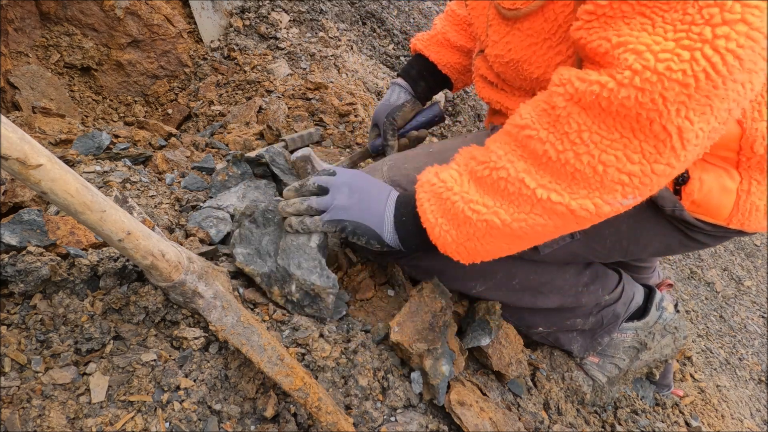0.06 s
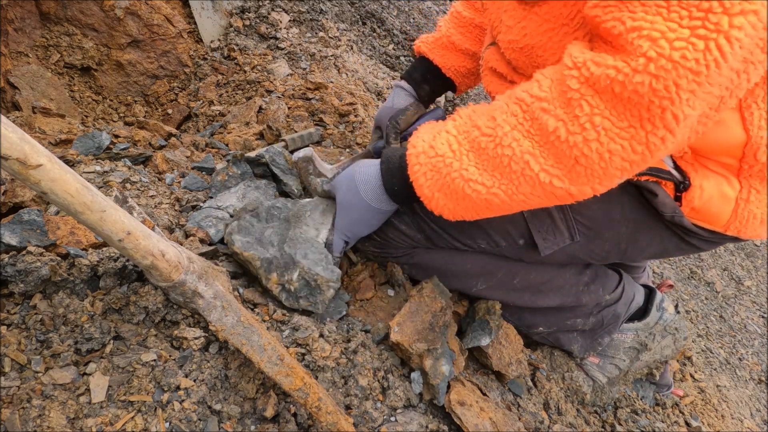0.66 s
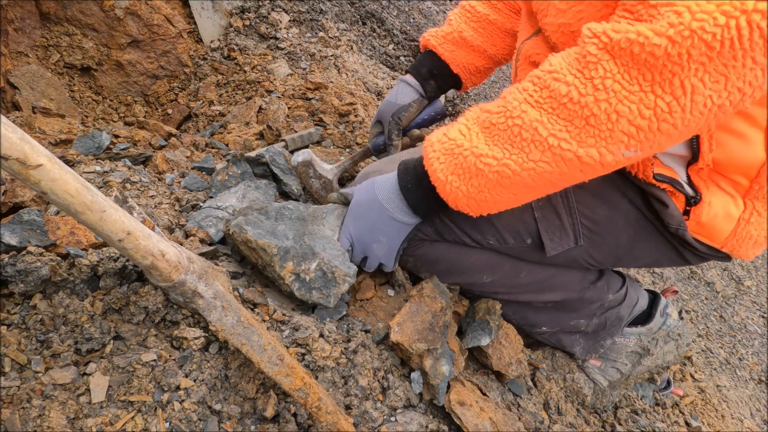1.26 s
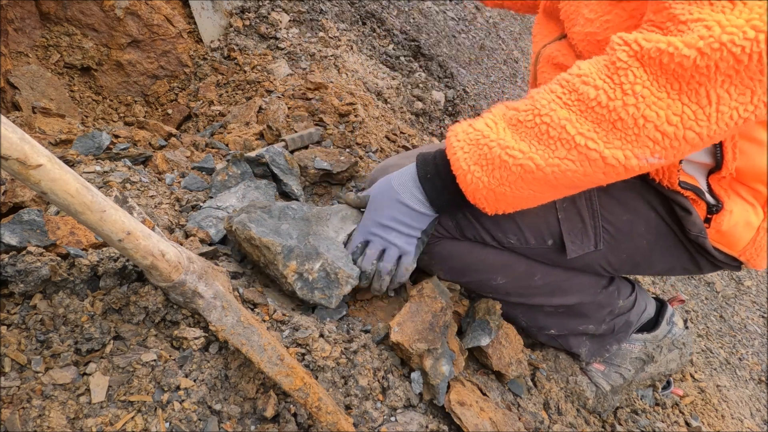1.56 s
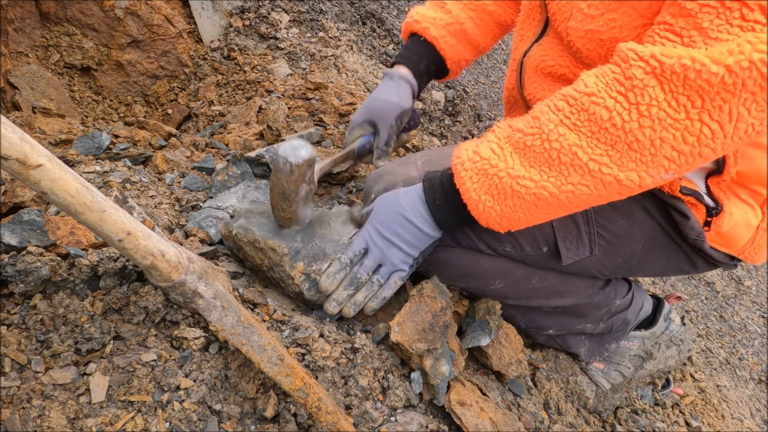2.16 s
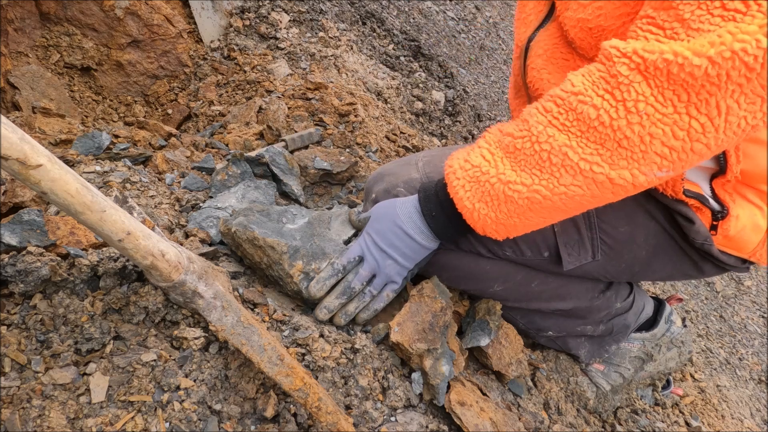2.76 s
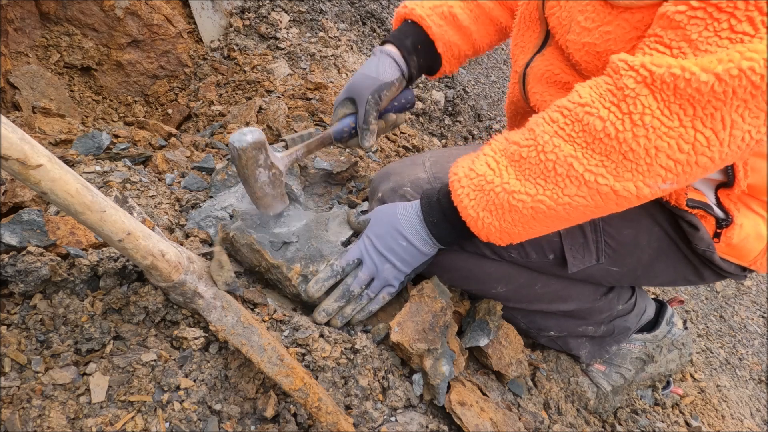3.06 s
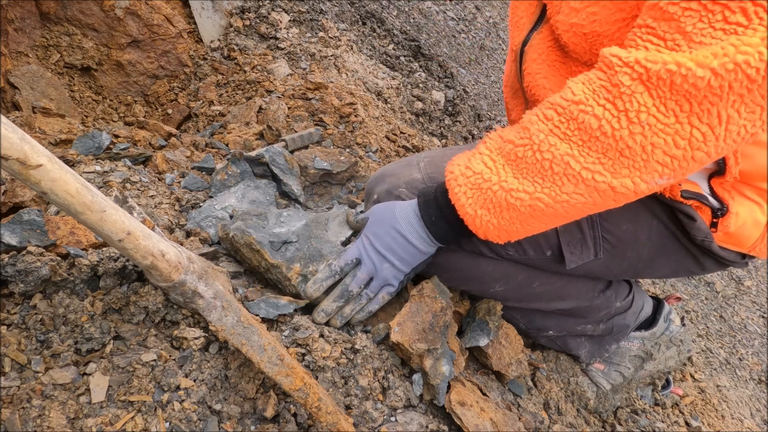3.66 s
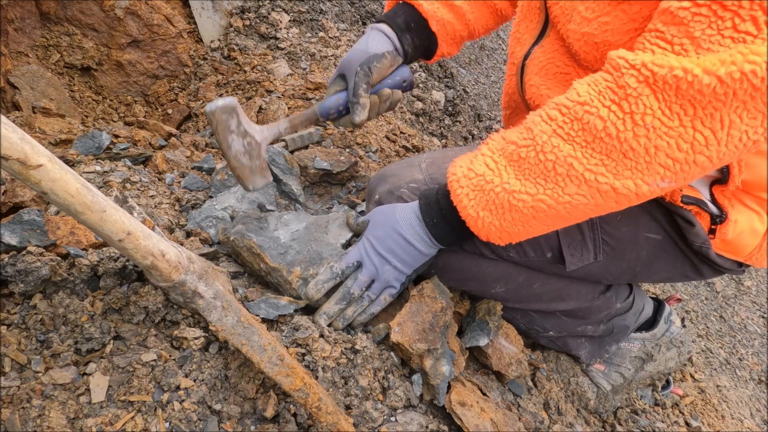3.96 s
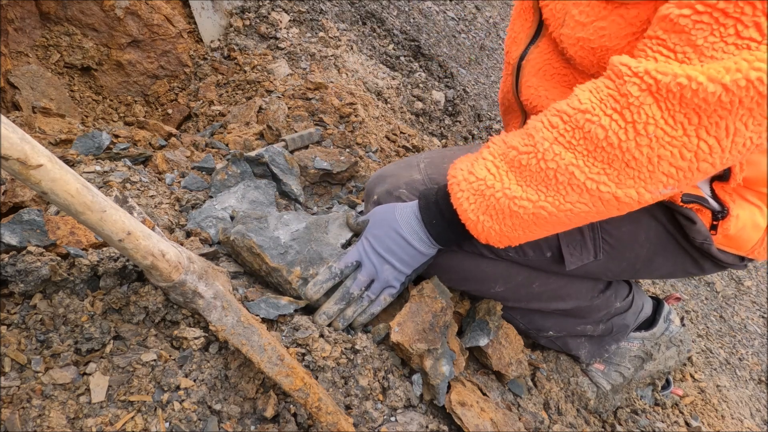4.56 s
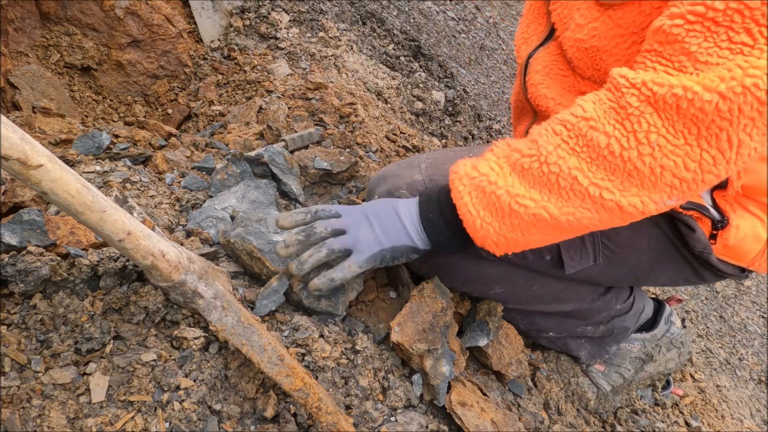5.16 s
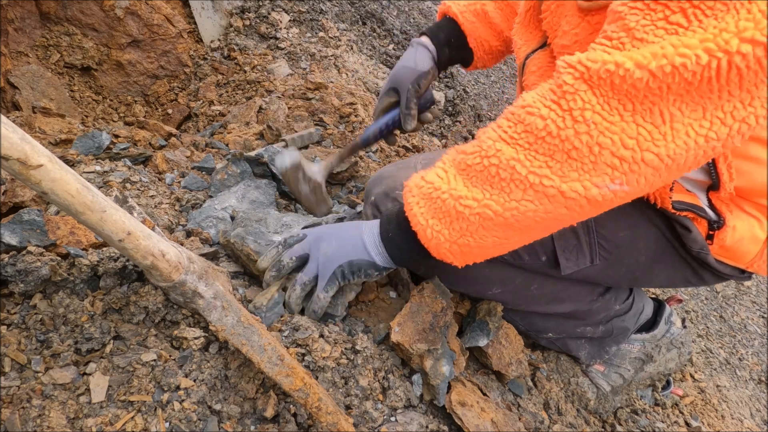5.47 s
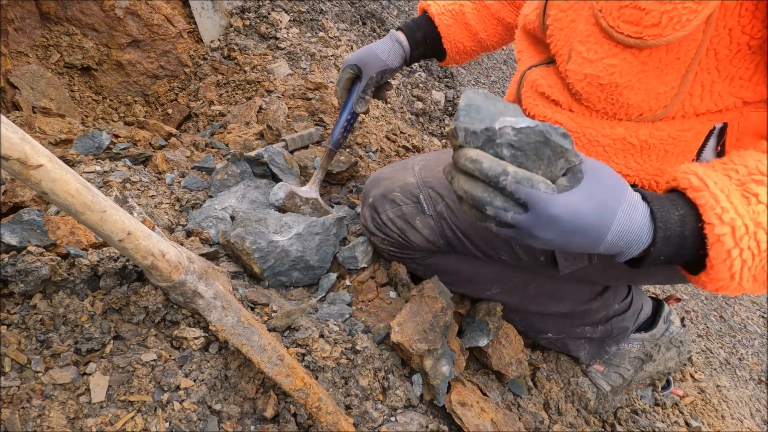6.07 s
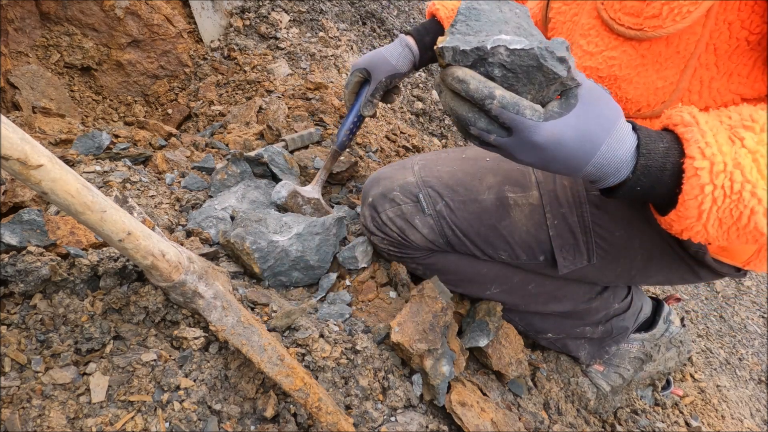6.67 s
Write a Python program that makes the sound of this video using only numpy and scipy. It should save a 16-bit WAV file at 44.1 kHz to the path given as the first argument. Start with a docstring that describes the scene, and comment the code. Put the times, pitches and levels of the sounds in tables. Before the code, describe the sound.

A rock is handled close by in the open air, over a low rumble and faint hiss of distant traffic. At about 0.1 seconds it tips over with a hollow knock and a thud. Until 2 seconds, gloves and sleeves brush it softly, it scrapes over grit in short strokes, and small stones tick. A hand hammer then strikes the rock five times, at about 2.3, 3.1, 4.0, 4.8 and 5.6 seconds. Each blow is a dry crack with a very brief ring and a thud from the clay beneath; the last is duller. Fine crumbs and chips patter down after the blows, and a thin flake clinks at 3.2 seconds. Stones knock, scrape lightly and click amid glove rustle from about 5.3 to 6 seconds. The traffic dips at every blow and creeps back, remaining nearly alone until the end at about 7 seconds.

```python
"""A hand hammer splits a grey rock, swung by a collector kneeling in an open clay pit.
Each blow is a dry crack, as steel makes the stone ring briefly, and a thud of the ground beneath.
Chips and crumbs fall, gloves and sleeves brush the rock, and the rock scrapes over grit.
Far traffic rumbles and hisses behind; it sinks at every blow and creeps back."""
import sys
import numpy as np
from scipy import signal
from scipy.fft import rfft, irfft
from scipy.io import wavfile

SR = 44100
rng = np.random.default_rng(int(sys.argv[2]) if len(sys.argv) > 2 else 0)


def log_audio(samples):
    """Write samples as a 16-bit WAV file to the path given in sys.argv[1]."""
    # one column per channel
    frames = np.atleast_2d(samples).T
    # limit to full scale, then quantise
    limited = np.clip(frames, -1, 1)
    pcm = np.round(limited * 32767).astype(np.int16)
    wavfile.write(sys.argv[1], SR, pcm)


N = 300762
TIME = np.arange(N) / SR

# Hammer blows: start_s, thud_db, traffic_sink_db, hiss_drop_db, lead_in_db,
# seven ring_db values (one for each pitch of colour_hz in cracks), grit_db
BLOWS = [(2.2990, -16.5, 10.2, 12, 1, -19, -6, -7.5, -16.5, -38.5, -19.5, -21.5, -39),
         (3.1315, -14.5, 10.45, 4.5, 0, -19, -8.5, -13, -6.5, -29, -14, -28.5, -39.5),
         (3.9593, -17, 11.4, 3.5, -0.5, -19, -6.5, -8, -17, -9, -17, -17.5, -38),
         (4.7959, -15.5, 10.56, -3.5, -7, -9.5, -14, -2, -16.5, -20.5, -15.5, -27, -41),
         (5.6066, -16, 7.1, -2, -24.5, -16, -26, -18.5, -10, -8.5, -42, -55, -35)]


def from_db(db):
    """Turn decibels into a gain to multiply by."""
    return 10 ** (np.asarray(db) / 20)


def rms_one(x):
    """Scale a sound so that its average power is 1."""
    return x / np.sqrt(np.mean(x ** 2) + 1e-20)


def at_hz(points, hz):
    """Read between rows of (pitch_hz, value), with octaves evenly spaced."""
    pitch, value = np.transpose(points)
    return np.interp(np.log(hz), np.log(pitch), value)


def add(track, start_s, sound):
    """Mix a short sound into a track."""
    start = max(round(start_s * SR), 0)
    track[..., start:start + sound.shape[-1]] += sound[..., :N - start]


def lean(hz):
    """Left and right gains of a near sound at this pitch."""
    # How much louder the left side is: pitch_hz, left_minus_right_db
    balance = [(200, 0), (750, -2.3), (1500, 0), (3000, .6), (6000, 2), (12000, 4.8)]
    return from_db(np.array([[.5], [-.5]]) * at_hz(balance, hz))


def noise(spectrum, grain_db=0, near=False):
    """Noise shaped by rows of (pitch_hz, level_db); grains of uneven size make it crackle."""
    hz = np.maximum(np.fft.rfftfreq(N, 1 / SR), 1)
    grains = rng.standard_normal(N) * from_db(grain_db * np.clip(rng.standard_normal(N), -3, 3))
    fade_ends = 1 / (1 + (spectrum[0][0] / hz) ** 4) / (1 + (hz / spectrum[-1][0]) ** 12)
    colour = from_db(at_hz(spectrum, hz)) * fade_ends * (lean(hz) if near else 1)
    return rms_one(irfft(rfft(grains) * colour, N))


def ring(t, hz, ring_s):
    """One tone of a struck object: it starts within a cycle and fades by 60 dB in ring_s."""
    onset = 1 - np.exp(-2 * np.pi * hz * t)
    return onset * np.sin(2 * np.pi * hz * t) * np.exp(-np.log(1000) * t / ring_s)


def swell(middle_s, half_s):
    """A smooth rise and fall of height 1."""
    return np.exp(-.5 * ((TIME - middle_s) / half_s) ** 2)


def strokes(rows):
    """The pressure of a hand: every stroke swells and fades."""
    return sum(from_db(db) * swell(middle_s, half_s) for middle_s, half_s, db in rows)


def clumps(depth_db, per_s):
    """Sticking and slipping: a gain that jumps up and down many times a second."""
    steps = np.clip(rng.standard_normal(N // 16), -2, 2)
    return rms_one(from_db(depth_db * np.interp(TIME * per_s, np.arange(len(steps)), steps)))


def sinking(sink_s=.033, recover_db_per_s=4.5, drop_s=.12):
    """How far the background dips after each blow: a slowly recovering part and a brief part."""
    slow_db, brief_db = np.zeros(N), np.zeros(N)
    for start_s, _, sink_db, drop_db, *_ in BLOWS:
        age = np.maximum(TIME - start_s, 0)
        onset = np.minimum(age / sink_s, 1)
        slow_db = np.maximum(slow_db, onset * (sink_db - recover_db_per_s * age))
        brief_db += onset * drop_db * np.exp(-(age / drop_s) ** 4)
    return slow_db, brief_db


def traffic(rumble_db=-40.5, tyre_db=-56.5, rumble_side_db=-22, tyre_side_db=-10):
    """Far engines rumble; tyres hiss a little wider and swell once. Both sink after each blow."""
    # Engine rumble: pitch_hz, level_db
    rumble_colour = [(12, -33), (20, -5.5), (38, 1), (60, -2), (125, -11), (166, -19.5), (208, -21),
                     (271, -30.5), (400, -36.5), (520, -54.5), (880, -120)]
    # Tyre hiss: pitch_hz, level_db
    tyre_colour = [(250, -10), (400, -10), (600, -7), (800, -8.5), (1050, -4.5), (1300, 0), (1480, 0),
                   (1750, -10.5), (2300, -15), (3000, -27.5), (5000, -37), (12000, -42.5)]
    sides = np.array([[1], [-1]])
    rumble = noise(rumble_colour) + sides * from_db(rumble_side_db) * noise(rumble_colour)
    tyres = noise(tyre_colour) + sides * from_db(tyre_side_db) * noise(tyre_colour)
    sunk_db, drop_db = sinking()
    swell_db = 4 * swell(middle_s=.833, half_s=.15)
    rumble_gain = from_db(rumble_db - .7 * sunk_db)   # the rumble sinks less than the hiss
    tyre_gain = from_db(tyre_db + swell_db - sunk_db - drop_db)
    return rumble_gain * rumble + tyre_gain * tyres


def cloth(rest_db=-90.5):
    """Gloves and sleeves brush softly over the rock and never lie quite still."""
    # Brushing strokes: middle_s, half_length_s, level_db
    brushes = [(0.03, 0.094, -62), (0.32, 0.043, -58.5), (0.53, 0.052, -68.5), (0.82, 0.098, -61),
               (1.0, 0.051, -62.5), (1.38, .11, -66), (1.72, 0.074, -56), (1.97, 0.048, -64.5),
               (2.69, 0.011, -82), (2.84, 0.012, -81.5), (3.04, 0.087, -84), (3.85, 0.1, -80.5),
               (4.615, 0.021, -72), (5.08, 0.073, -78), (5.26, 0.048, -71.5), (5.45, 0.045, -65),
               (5.63, 0.064, -63), (5.86, 0.12, -70)]
    # Cloth rustle: pitch_hz, level_db
    colour = [(1200, -13.5), (2000, -1), (3000, -1), (4200, -4.5), (5500, -5.5), (7500, -7), (8700, -18),
              (10200, -11.5), (12400, -15), (15000, -30.5)]
    rustle = noise(colour, grain_db=7, near=True) * clumps(depth_db=2.2, per_s=110)
    return (from_db(rest_db) + strokes(brushes)) * rustle


def scrapes():
    """Stone dragged over grit rasps in short, catching strokes."""
    # Drags of the rock: middle_s, half_length_s, level_db
    drags = [(0.078, 0.0061, -46), (0.105, 0.0075, -48.5), (0.532, 0.003, -57), (0.555, 0.008, -56),
             (0.753, 0.0079, -59.5), (0.87, 0.027, -63), (0.997, 0.014, -52), (1.676, 0.036, -56.5),
             (1.732, 0.0075, -52), (1.763, 0.0078, -48), (1.813, 0.014, -49.5), (5.45, 0.015, -56.5),
             (5.565, 0.007, -56.5)]
    # Rasp of stone: pitch_hz, level_db
    colour = [(940, -7), (1600, 1), (3260, -1), (4030, -4.5), (7840, -11), (8720, -16), (10500, -12),
              (12800, -17), (16000, -38)]
    rasp = noise(colour, grain_db=9, near=True) * clumps(depth_db=2.6, per_s=400)
    return strokes(drags) * rasp


def crumbs(level_db=-78.5, flight_s=.26, spread_s=.091, low_hz=4500, high_hz=12000):
    """Fine crumbs thrown up by each blow patter down in a thin shower."""
    shower = sum(swell(start_s + flight_s, spread_s) for start_s, *_ in BLOWS)
    patter = noise([(low_hz, 0), (high_hz, -4)], grain_db=9, near=True) * clumps(depth_db=5, per_s=160)
    return from_db(level_db) * shower * patter


def flake():
    """A thin plate of stone drops on one edge, then lies flat, ringing at each touch."""
    # Touches on the ground: start_s, level_db
    touches = [(3.218, -49), (3.2318, -54)]
    # Tones of the flake: pitch_hz, level_db, ring_s
    tones = [(800, -6.5, 0.098), (1001, 3, 0.077), (1400, 4.5, 0.042), (1848, -7, 0.063)]
    out, t = np.zeros(N), np.arange(SR // 5) / SR
    clink = sum(from_db(db) * ring(t, hz, ring_s) for hz, db, ring_s in tones)
    for start_s, db in touches:
        add(out, start_s, from_db(db) * clink)
    return out


def chips(octaves=.89, cycles=12, settle_s=.00083, dull_hz=11000, count=20):
    """Every chip has brief tones of its own and touches down on several corners."""
    # Falling chips and small stones knocking: start_s, level_db, centre_hz
    landings = [(0.5996, -41.5, 3070), (0.7194, -41.5, 2660), (1.0764, -44.5, 6860), (2.5402, -56, 8650),
                (2.5702, -49.5, 9500), (3.2172, -49, 3850), (3.2295, -53, 3800), (3.2975, -52, 6000),
                (3.3599, -53, 6650), (3.6038, -49.5, 6200), (4.0876, -45, 3120), (4.0925, -41, 7300),
                (4.9898, -55.5, 6160), (5.337, -35, 1900), (5.796, -48, 7140), (5.8846, -42, 2100),
                (5.899, -46.5, 3580), (5.975, -47, 3860)]
    out, t = np.zeros((2, N)), np.arange(SR // 20) / SR
    for start_s, level_db, centre_hz in landings:
        pitches = np.clip(centre_hz * 2 ** (octaves * rng.uniform(-1.21, 1, count)), 600, 13000)
        touches = settle_s * rng.exponential(1, count)
        tick = sum(rng.normal() * ring(np.maximum(t - late_s, 0), hz, cycles / hz)
                   for hz, late_s in zip(pitches, touches))
        add(out, start_s, from_db(level_db) * lean(centre_hz) * tick / np.abs(tick).max())
    return signal.sosfilt(signal.butter(3, dull_hz, fs=SR, output="sos"), out + 1e-18)


def bounce(t, start_hz, sag_s, spread_s, peak_s=.012):
    """The rock bounces on soft clay; the pitch sags as the weight comes off the ground."""
    cycles = start_hz * sag_s * (1 - np.exp(-t / sag_s))
    return -np.sin(2 * np.pi * cycles) * np.exp(-((t - peak_s) / spread_s) ** 2)


def thuds(tip_s=.11, tip_db=-17.5):
    """The ground thuds under every blow, and once with a hollow knock as the rock is tipped over."""
    # Tones of the hollow knock: pitch_hz, level_db, ring_s
    tones = [(243, -22.5, 0.054), (322, -27.5, 0.044), (613, -36, 0.015)]
    out, t = np.zeros(N), np.arange(SR // 10) / SR
    thud = bounce(t, start_hz=91, sag_s=.055, spread_s=.0165)
    for start_s, thud_db, *_ in BLOWS:
        add(out, start_s, from_db(thud_db) * thud)
    knock = sum((-1) ** k * from_db(db) * ring(t, hz, ring_s) for k, (hz, db, ring_s) in enumerate(tones))
    add(out, tip_s, knock + from_db(tip_db) * bounce(t, start_hz=105, sag_s=.05, spread_s=.011))
    return out


def grit(hold_s=.004, crush_s=.026, crush_db=3, scatter_s=.16, scatter_db=-19):
    """Stone crushes under the hammer, then dust sprays and the clay banks scatter the sound."""
    # Crumbling stone: pitch_hz, level_db
    colour = [(300, 2.5), (700, 5), (1500, -2.5), (3000, -5), (4300, -10), (7000, -11), (9000, -21),
              (12000, -21), (15000, -25)]
    level, t = np.zeros(N), np.arange(SR // 4) / SR
    after = np.maximum(t - hold_s, 0)
    fade = from_db(crush_db - 60 * after / crush_s) + from_db(scatter_db - 60 * after / scatter_s)
    for start_s, *_, grit_db in BLOWS:
        add(level, start_s, from_db(grit_db) * fade)
    return level * noise(colour, grain_db=4, near=True)


def lead_in(crack, gap_s=.0104, late_tick_db=-17, early_tick_db=-30):
    """Two faint, duller ticks and a short hollow swell run just ahead of each crack."""
    # Narrow bands that swell: pitch_hz, width_hz, level_db
    bands = [(680, 90, -4), (895, 37, 4), (7900, 53, -0.5)]
    start_s, _, _, _, lead_in_db, *_ = np.transpose(BLOWS)
    source = crack * from_db(np.interp(TIME, start_s, lead_in_db)) + 1e-18
    tick = signal.sosfilt(signal.butter(1, [700, 5000], "band", fs=SR, output="sos"), source)
    gap = round(gap_s * SR)
    out = from_db(late_tick_db) * np.roll(tick, -gap, axis=1)
    out += from_db(early_tick_db) * np.roll(tick, -2 * gap, axis=1)
    for hz, width_hz, level_db in bands:
        band = signal.iirpeak(hz, hz / width_hz, fs=SR)
        # filtering backwards in time makes the band grow towards the crack
        out += from_db(level_db) * signal.lfilter(*band, source[:, ::-1])[:, ::-1]
    return out


def cracks(stagger_s=.0003, detune=.015):
    """Each hammer blow rings the rock briefly; where it lands sets which tones are strong."""
    # Tones of rock and hammer head, damped by clay and hand: pitch_hz, level_db, ring_s
    tones = [(203, -3, 0.051), (292, -1, 0.015), (396, -5, 0.026), (542, -0.5, .017), (658.5, 1, 0.014),
             (904.6, 0.5, 0.0097), (1420, 0.5, 0.0098), (1750, 1, 0.0078), (2010, -2, 0.0097),
             (2452, -2.5, .007), (2920, 2, 0.0047), (3440, -4.5, 0.0066), (4730, -2, 0.0031),
             (5400, -6.5, 0.0053), (6040, -8, 0.0062), (6920, -1, 0.0048), (7830, -9.5, 0.0031),
             (10340, -5, 0.0053), (11670, -7.5, 0.0072), (12300, -2.5, 0.0036)]
    # Pitches at which a blow's ring_db values apply: pitch_hz
    colour_hz = [400, 800, 1550, 2900, 4300, 7000, 12000]
    out, t = np.zeros((2, N)), np.arange(SR // 10) / SR
    for start_s, _, _, _, _, *ring_db, _ in BLOWS:
        for k, (hz, level_db, ring_s) in enumerate(tones):
            strength = from_db(level_db + np.interp(np.log(hz), np.log(colour_hz), ring_db))
            # the hammer bites in stages, so the short high tones start unevenly
            late_s = stagger_s * abs(rng.normal()) * (hz > 2000)
            pitch_hz = hz * (1 + detune * rng.normal())
            add(out, start_s + late_s, (-1) ** k * strength * lean(hz) * ring(t, pitch_hz, ring_s))
    return out


def scene():
    """Blows and handling close by, traffic far off, no walls."""
    # The near sounds reach left and right a little out of step: pitch_hz, left_ahead_radians
    side_lead = [(150, 0), (750, -0.22), (1500, .3), (4000, -0.69), (12000, -0.91)]
    crack = cracks()
    near = crack + lead_in(crack) + grit() + thuds() + chips() + flake() + crumbs() + cloth() + scrapes()
    hz = np.maximum(np.fft.rfftfreq(N, 1 / SR), 1)
    side_shift = np.exp(np.array([[.5j], [-.5j]]) * at_hz(side_lead, hz))
    return irfft(rfft(near) * side_shift, N) + traffic()


def record(dry):
    """The tallest peaks are flattened, the highest treble droops and the very top is cut."""
    ceiling, droop_hz, cutoff_hz = .53, 14000, 17400
    limited = dry / (1 + (dry / ceiling) ** 6) ** (1 / 6)
    drooped = signal.sosfilt(signal.butter(2, droop_hz, fs=SR, output="sos"), limited)
    return signal.sosfilt(signal.cheby2(12, 70, cutoff_hz, fs=SR, output="sos"), drooped)


dry = scene()
out = record(dry)
log_audio(out)
```